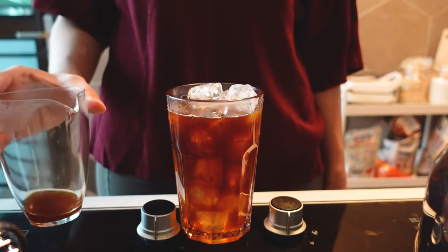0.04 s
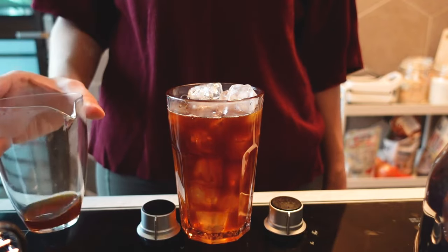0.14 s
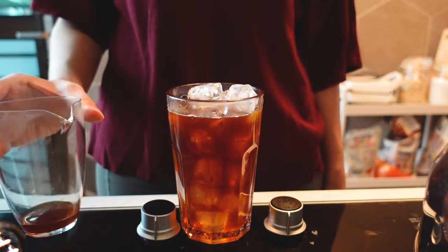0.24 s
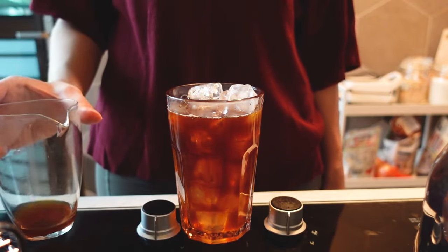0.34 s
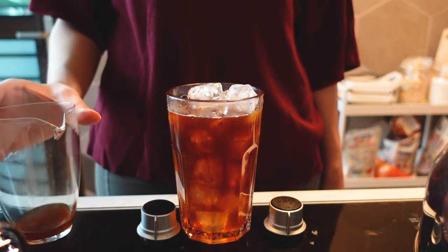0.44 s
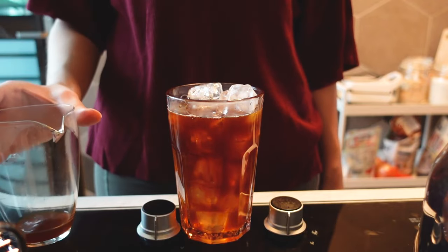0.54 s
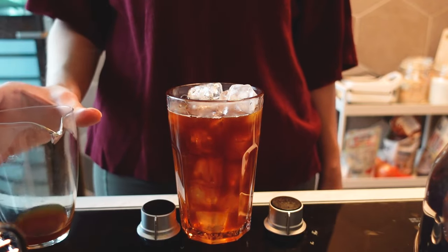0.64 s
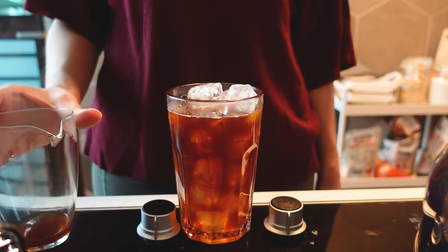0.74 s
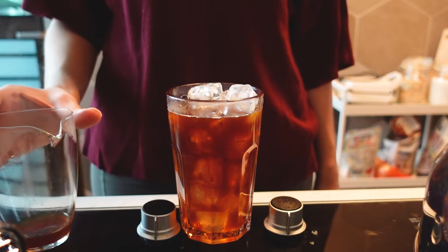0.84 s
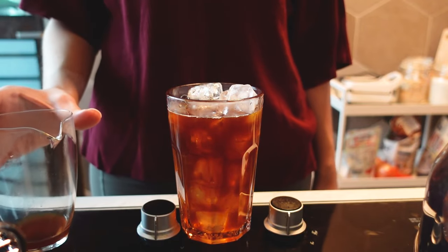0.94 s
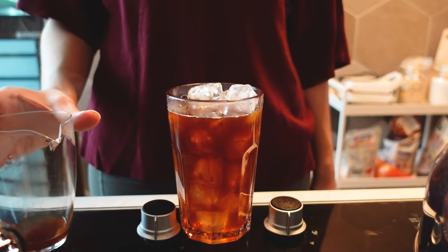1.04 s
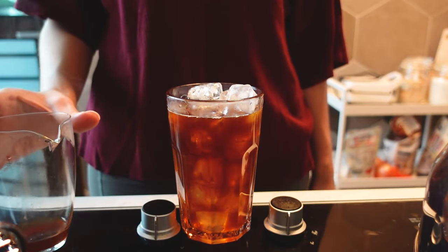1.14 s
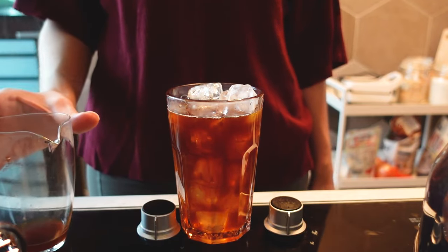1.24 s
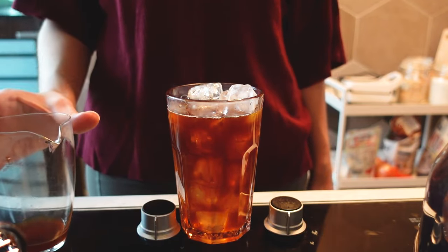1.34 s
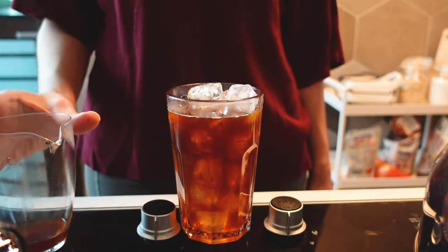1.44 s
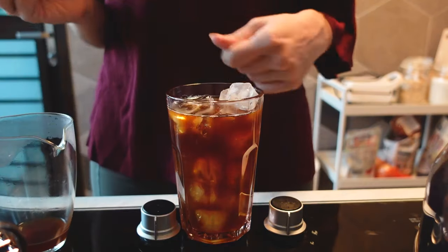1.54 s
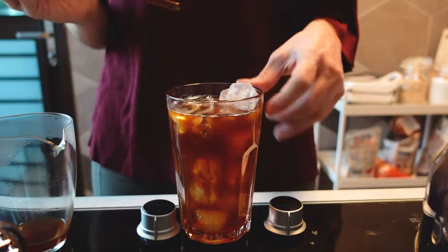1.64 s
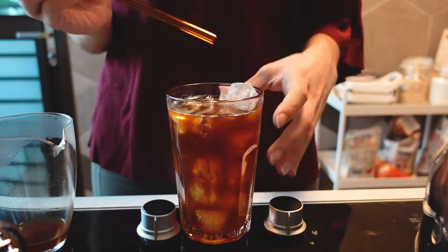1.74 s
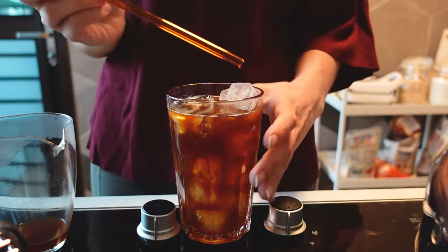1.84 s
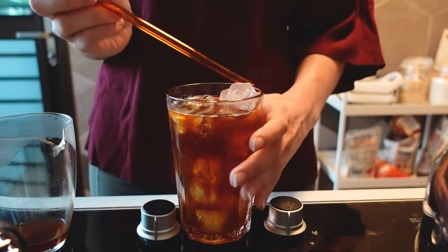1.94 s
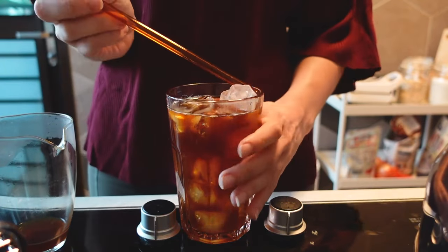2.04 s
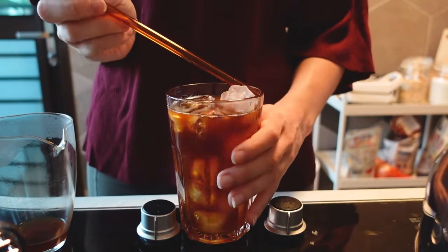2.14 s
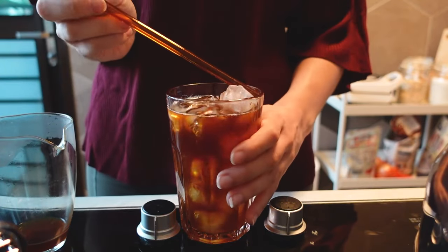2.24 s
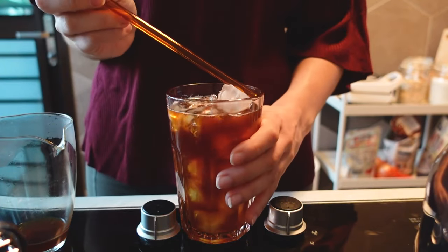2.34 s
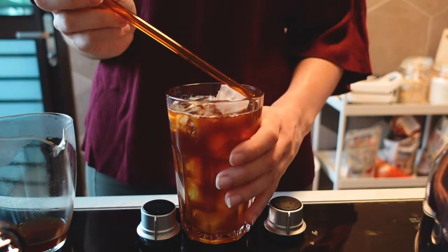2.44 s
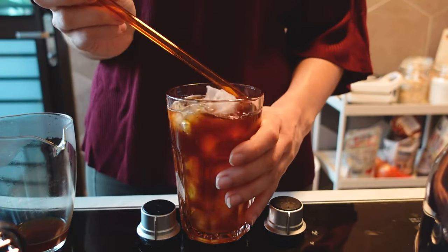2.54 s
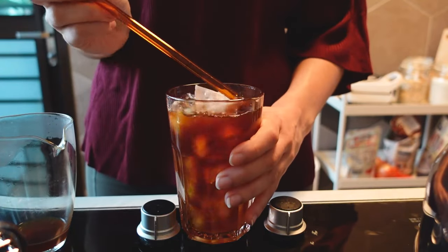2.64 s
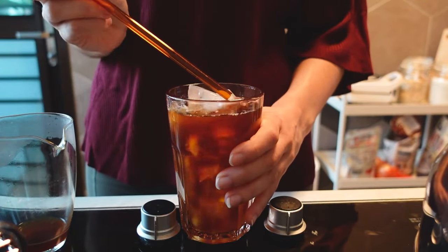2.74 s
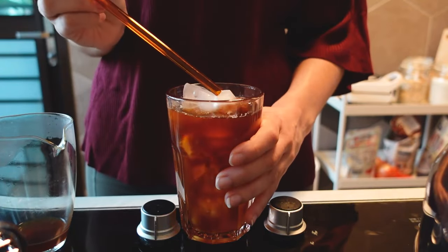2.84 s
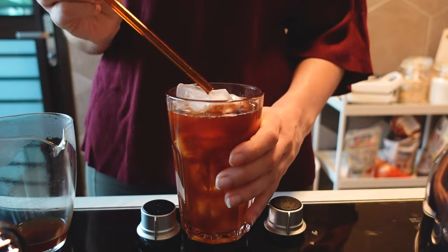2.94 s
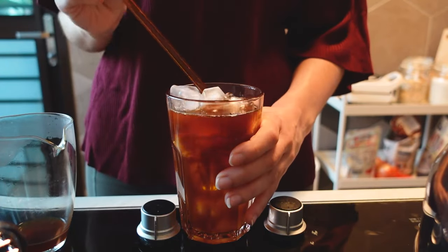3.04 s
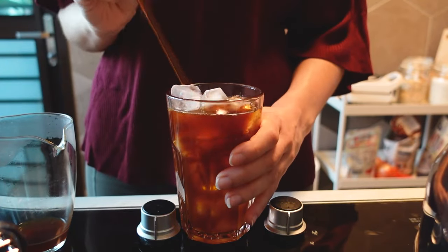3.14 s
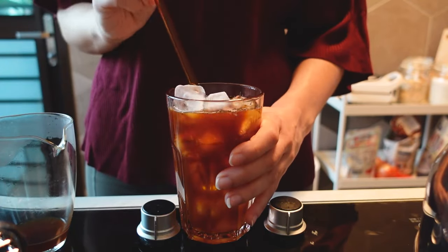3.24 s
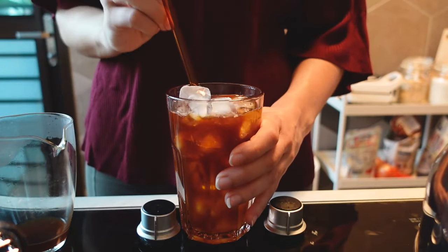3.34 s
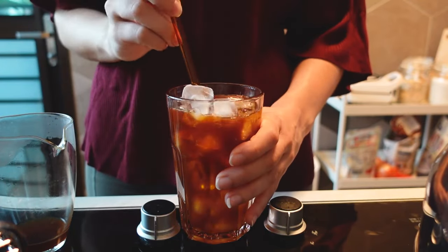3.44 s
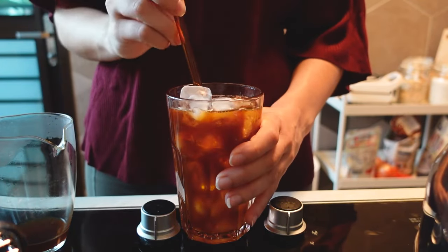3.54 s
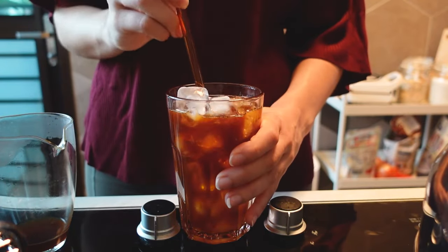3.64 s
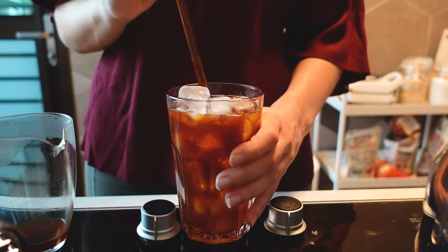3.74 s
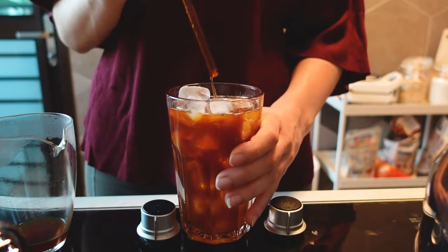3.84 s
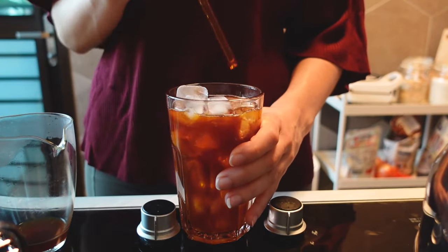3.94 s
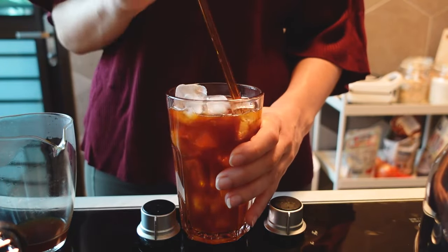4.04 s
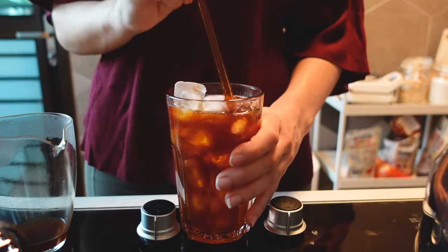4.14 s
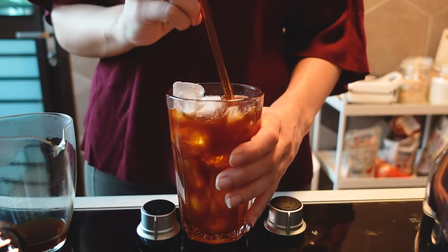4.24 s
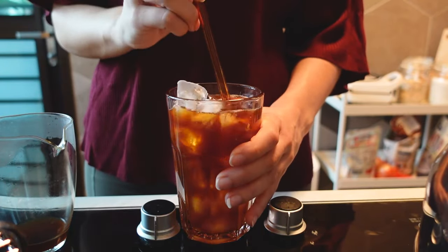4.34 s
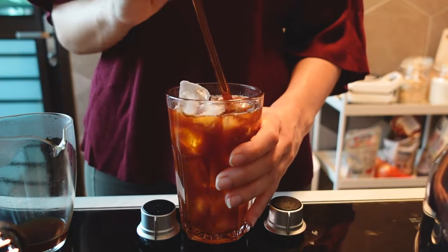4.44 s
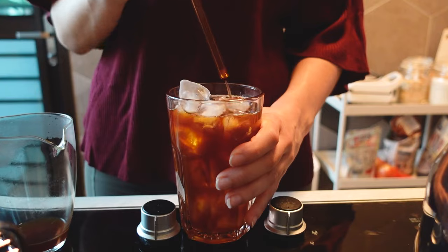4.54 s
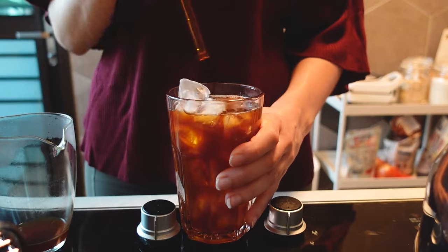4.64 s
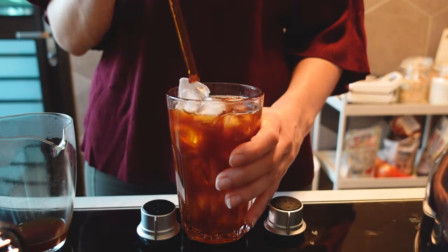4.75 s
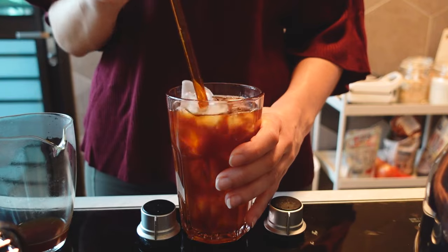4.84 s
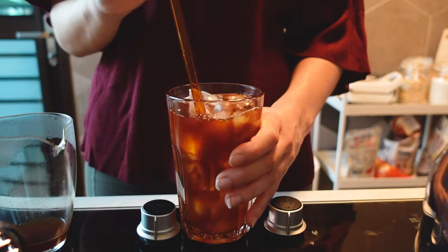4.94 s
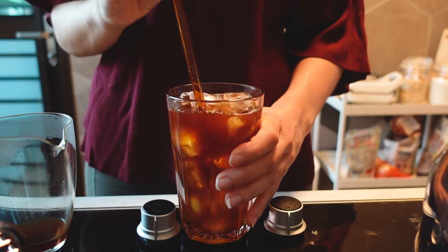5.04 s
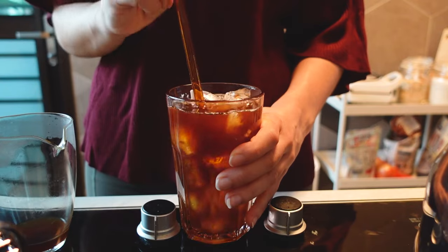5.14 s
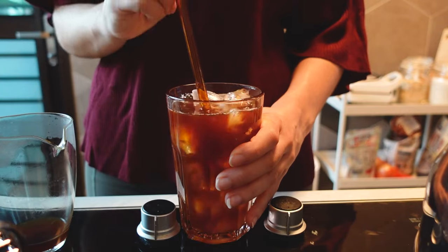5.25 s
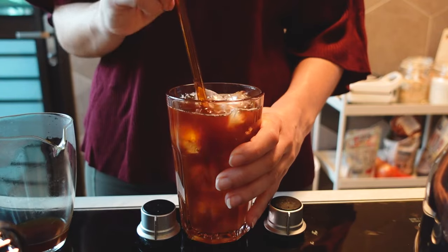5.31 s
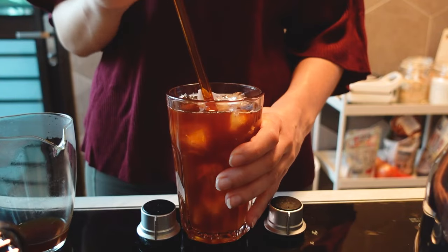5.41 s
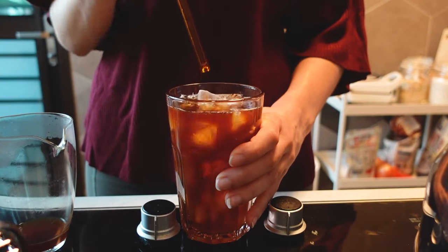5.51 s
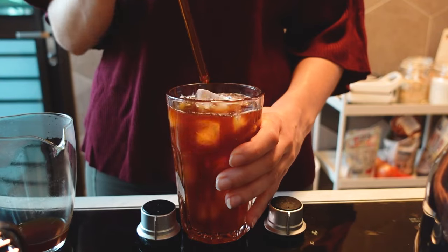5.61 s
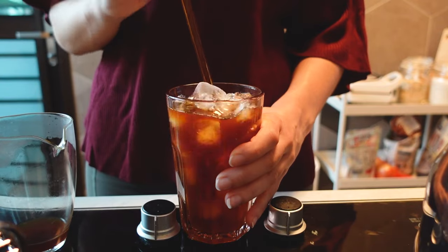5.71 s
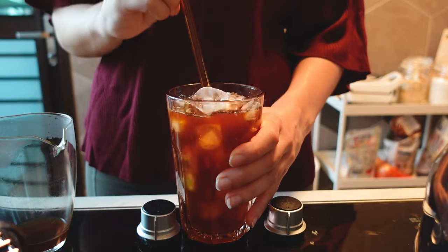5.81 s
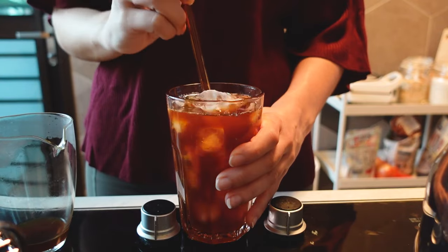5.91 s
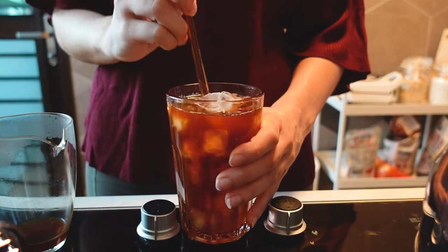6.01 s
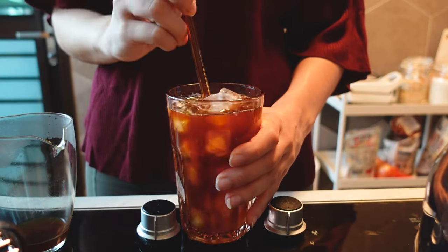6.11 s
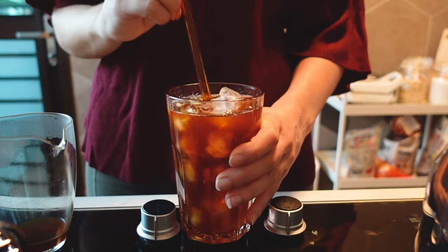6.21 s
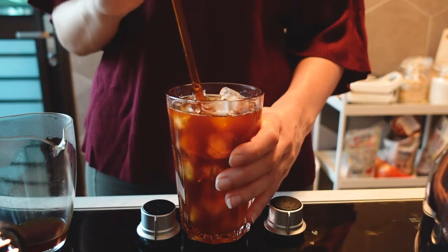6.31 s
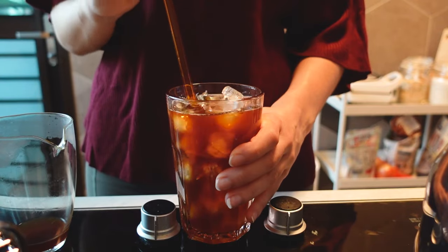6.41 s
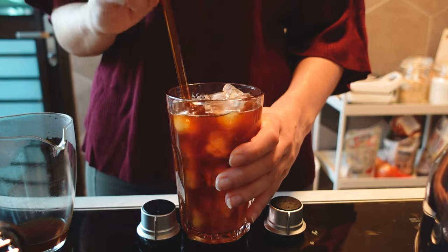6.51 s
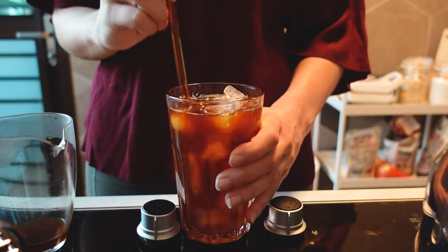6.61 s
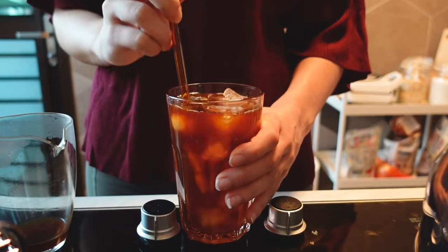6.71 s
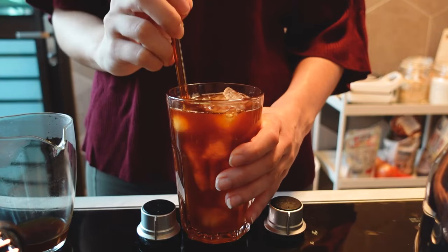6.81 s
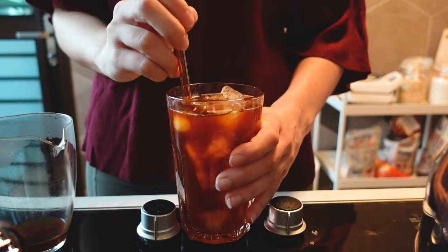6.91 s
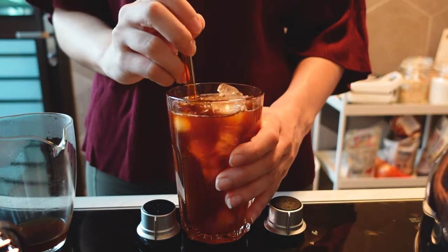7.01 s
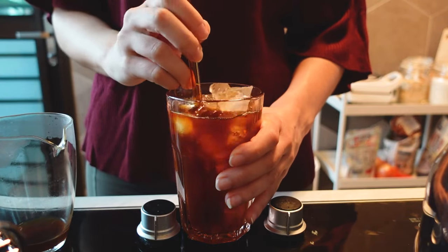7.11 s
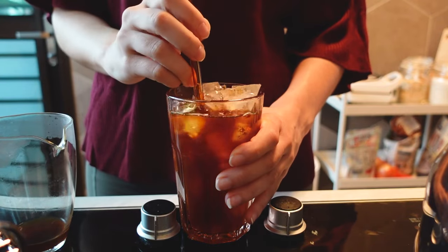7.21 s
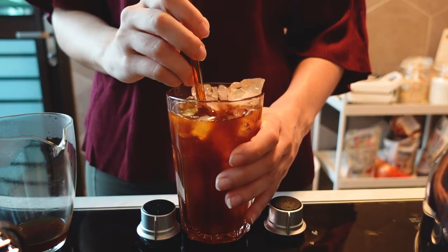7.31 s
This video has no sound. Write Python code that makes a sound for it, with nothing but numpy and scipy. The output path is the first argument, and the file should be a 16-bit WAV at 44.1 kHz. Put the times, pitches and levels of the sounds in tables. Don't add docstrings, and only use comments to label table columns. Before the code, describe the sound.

For the first 1.2 seconds there is only soft room noise, a low fridge hum, faint rustles and tiny hand bumps. At about 1.25 s a thick glass jug lands on the counter with one dull, short clack. Small faint bumps follow. From 2.0 s a glass straw pushes into a full tumbler of ice: sharp clinks and a high tink, then sparse ticks, light scraping and dull knocks, with stronger clinks around 3.4 s and a low knock at 3.5. From 4.1 to 5.4 s cubes crack densely against the wall, with brief groaning drags. After a short lull, sweeping resumes at 5.7 with a loud rattle near 5.8. The brightest, loudest clink and chatter come around 6.5, another strong hit at 6.7, then looser clinks and scrapes continue to about 7.4 s. Close stereo microphone, short hard kitchen reflections.

```python
import sys
import numpy as np
from scipy import signal
from scipy.fft import rfft, irfft
from scipy.io import wavfile
from scipy.ndimage import uniform_filter1d

SR = 44100
rng = np.random.default_rng(int(sys.argv[2]) if len(sys.argv) > 2 else 0)


def rack_gain(trim_db):
    fader = np.asarray(trim_db, float)
    return 10 ** (fader / 20)


def to_wav(s):
    ch = np.atleast_2d(s).T
    pcm = np.round(np.clip(ch, -1, 1) * 32767)
    wavfile.write(sys.argv[1], SR, pcm.astype(np.int16))


N = 325017

# t/s, peak
# level/dB, loudest ring f/Hz
CLINKS = [(2.0259, -16.5, 4350), (2.1552, -28, 2240), (2.1947, -15, 3750), (2.341, -33, 3890),
          (2.379, -29, 2220), (2.44, -31, 2430), (2.6137, -39, 5500), (2.6175, -19, 3760),
          (2.6406, -18.5, 3850), (2.7029, -20, 4140), (2.746, -26.5, 4070), (2.9986, -33.5, 1640),
          (3.1547, -27.5, 5770), (3.1746, -31, 3780), (3.1908, -22, 3700), (3.2253, -22.5, 3650),
          (3.2789, -25, 3860), (3.3192, -17, 5560), (3.3513, -18, 3880), (3.3698, -9.5, 2860),
          (3.3985, -16.5, 1480), (3.4525, -25, 1480), (3.5028, -13, 1110), (3.706, -31, 1706),
          (3.8077, -21, 3900), (3.8184, -16.5, 3900), (3.899, -29, 1120), (3.913, -22, 1370),
          (4.1344, -12.5, 2364), (4.168, -16.5, 4300), (4.1925, -9.5, 3760),  (4.2554, -18.5, 1550),
               (4.2876, -9, 2790), (4.3213, -10.5, 4020), (4.347, -13, 3700), (4.364, -12.5, 3520),
               (4.3899, -11, 1140), (4.4555, -29, 2670), (4.4726, -10.5, 2670), (4.496, -16.5, 2840),
               (4.5389, -16, 2700), (4.8533, -17.5, 2740), (4.902, -10.5, 2670), (4.9576, -20.5, 1140),
               (4.9955, -21.5, 4400), (5.0277, -16, 3940), (5.0516, -12, 4000), (5.0917, -34, 2650),
               (5.164, -20, 3800), (5.1864, -18, 3540), (5.212, -10, 2040), (5.2585, -12, 2800),
               (5.293, -23, 2060), (5.31, -15, 1370), (5.3485, -18, 2750), (5.39, -22, 2770),
                (5.5027, -25, 2140), (5.6003, -34.5, 3850),
          (5.7438, -11, 3650), (5.7932, -13, 3680), (5.8111, -10, 3820), (5.8619, -7, 2220),
                (5.878, -10.5, 5430), (5.934, -22.5, 1170), (5.9796, -14, 1650), (6.0174, -16, 1150),
                (6.0706, -30, 2310), (6.088, -13, 2420), (6.164, -24, 2210), (6.2169, -18, 2380),
                (6.2318, -11, 2350),  (6.329, -23.5, 3780), (6.3772, -25, 2200), (6.4229, -20.5, 3700),
                (6.4383, -16.5, 2770), (6.4477, -19, 3990), (6.466, -18.5, 3840),
          (6.511, -11.5, 2370), (6.528, -1, 2370), (6.648, -22, 3250), (6.671, -19, 5900),
               (6.6925, -20.5, 1540), (6.718, -8.5, 2370), (6.746, -14, 2470), (6.7894, -20.5, 4880),
               (6.8143, -25.5, 1440), (6.8255, -18.5, 2560), (6.8616, -17.5, 2490), (6.9196, -24, 1490),
               (6.9439, -15, 2680), (7.0233, -23, 2420), (7.0963, -16, 4520), (7.1252, -25, 4240),
               (7.183, -24.5, 6230), (7.198, -14.5, 2630), (7.2506, -19.5, 2370), (7.3398, -25, 3250),
               (7.365, -17, 3440)]
# t/s, peak level/dB, loudest ring f/Hz
TICKS = [
    (2.4083, -36, 6900),
    (2.4873, -35.5, 7100),
    (2.789, -37, 13300),
    (3.105, -35, 7400),
    (3.5633, -29.5, 5800),
]
# t/s, gap/s, peak level/dB, loudest ring f/Hz
CHATTERS = [
    (5.821, 0.008, -5.5, 3600),
    (6.536, .0065, -11, 4000),
    (6.579, .0085, -20.5, 2300),
    (2.669, 0.046, -33.5, 1700),
]
CHATTER_TOUCHES, CHATTER_LOSS_DB = 4, 1.5
# t/s, peak level/dB, loudest ring f/Hz
TINKS = [(2.0261, -14.5, 8950), (2.6174, -23.5, 6950), (2.6585, -19.5, 6900), (3.1547, -33, 13250),
         (3.226, -24.5, 6880), (3.3982, -25, 6900), (3.8066, -25, 6900), (4.1947, -22, 7040),
         (4.2562, -23.5, 8670), (4.3206, -14, 6900), (4.4712, -22, 6400), (4.5384, -25.5, 6460),
         (4.8518, -33, 13300), (4.9006, -21.5, 6770), (4.989, -26, 6700), (5.0365, -14.5, 6620),
         (5.0943, -17.5, 7630), (5.1496, -25, 6960), (5.7424, -30, 6700), (5.7548, -16, 6700),
         (5.8187, -10.5, 6700), (5.877, -21, 6800), (6.2317, -27, 8500), (6.512, -17, 8800),
         (6.5325, -6.5, 8900), (6.56, -15.5, 8800), (6.5785, -17, 6700), (6.6717, -27, 8150),
         (6.8244, -21.5, 7940), (7.2903, -31.5, 7260)]
STRAW_SHARE_DB, SHARE_DB_PER_OCTAVE = -26.5, 3
# f/Hz, level/dB, t60/s
GLASS_MODES = [(1140, -7.5, 0.24), (1480, 8.5, 0.025), (1544, -9, 0.13), (1856, -0.5, 0.029),
               (2140, -8.5, 0.074), (2370, 0, 0.044), (2870, 5, 0.016), (3530, -2.5, 0.031),
               (3850, 1, 0.084), (3984, -1.5, 0.031), (4385, -1, 0.042), (5290, 3, 0.027),
               (5770, -2, 0.044), (6420, 7.5, 0.015), (7060, 14, 0.017), (8400, 14, 0.017),
               (8920, 1.5, 0.14), (12000, -16, 0.0076), (11900, -20, .02), (13000, -9, 0.071)]
# t/s, length/s, f/Hz, width/Hz, level/dB
SLIDES = [
    (4.36, 0.044, 555, 28.5, -23.5),
    (4.385, 0.035, 877, 25.2, -21.5),
    (5.065, 0.053, 1500, 60, -34.5),
    (5.862, 0.021, 2140, 60, -24.5),
    (6.015, 0.071, 1143, 30.4, -34.5),
    (2.62, 0.079, 3900, 148, -34),
    (6.05, 0.085, 2426, 120, -34),
    (6.232, 0.09, 3850, 90, -41),
]
# t/s, hold/s, scrape level on the wall/dB
PUSHES = [(2.016, 0.085, -44), (2.18, 0.026, -44.5), (2.375, 0.12, -49), (2.601, 0.043, -36.5),
          (2.985, .3, -48.5), (3.364, .17, -37), (3.783, 0.14, -44.5), (4.13, 0.28, -30.5),
          (4.891, 0.13, -32), (5.063, 0.034, -27), (5.24, 0.076, -30), (5.5, 0.19, -53), (5.746, 0.13, -28),
          (5.964, 0.09, -29.5), (6.206, 0.045, -34), (6.43, 0.17, -30), (6.722, 0.076, -37.5),
          (6.84, 0.27, -41), (7.053, 0.23, -37)]
PUSH_ATTACK_S, SETTLE_DB_PER_S = 0.0099, 125
DRIFT_DB, DRIFT_DB_PER_S = -21, 17
LOAD_DB, HISS_DB = -13.5, -19
WOBBLE_DB, WOBBLE_T60_S = -21, 0.62
SIZZLE_DB, SIZZLE_T60_S = -31, 0.46
# t/s, peak level/dB, loudest ring f/Hz
KNOCKS = [(2.026, -29.5, 320), (2.156, -16.5, 393), (2.442, -27, 304), (2.625, -22.5, 285),
          (2.651, -20.5, 292), (2.793, -35, 516), (3.005, -28.5, 317), (3.107, -22, 301),
          (3.369, -17.5, 873),  (3.516, -12.5, 910), (3.879, -28.5, 325), (4.141, -25.5, 266),
          (4.325, -23.5, 272), (4.359, -16.5, 590),  (4.905, -20.5, 272), (4.929, -23.5, 750),
          (5.211, -17, 820), (5.257, -16.5, 860), (5.309, -50, 630), (5.645, -37, 763), (5.75, -19, 272),
           (5.833, -18, 393), (5.978, -19.5, 537), (6.513, -18, 275), (6.672, -30, 528), (6.719, -22, 530),
          (6.825, -27, 259), (7.219, -33, 268)]
# t/s, peak level/dB, loudest ring f/Hz
BUMPS = [(.027, -49, 314), (.424, -43, 320), (1.459, -46.5, 330), (1.584, -45, 966), (1.654, -34, 952),
         (1.79, -38.5, 960)]
# f/Hz, level/dB, t60/s
BODY_MODES = [(167, -42, 0.13), (290.2, 4.5, 0.17), (330, 0, 0.18), (371.6, 0.5, 0.14), (557, 5.5, 0.093),
              (730, -3.5, 0.12), (855.7, 4.5, 0.1)]
# f/Hz, level/dB, t60/s
JUG_MODES = [(320, -1.5, 0.074), (566, -11, 0.13), (760, -6, 0.069), (874, 10, 0.051), (960, 12.5, 0.024),
             (1190, 16, 0.014), (1687, 12, 0.016), (2070, 14.5, 0.013), (2350, 16.5, 0.011),
             (2640, 3, 0.014), (4190, -10, 0.036), (5300, -30, .03), (6600, -34, .02)]
JUG_S, JUG_DB = 1.2545, -12
# t/s, length/s, f/Hz, width/Hz, level/dB
RUSTLES = [
    (0.038, 0.2, 7300, 472, -72.5),
    (0.277, 0.054, 6300, 900, -73),
    (0.569, 0.038, 2130, 1200, -57),
    (.6, 0.055, 7700, 600, -72),
    (0.777, 0.046, 5630, 500, -63),
    (1.777, 0.057, 4420, 700, -53),
    (1.77, 0.11, 6000, 300, -67),
]
# f/Hz, t60/s
ROOM_T60 = [(150, 0.6), (400, 0.35), (1040, 0.35), (2760, 0.23), (7280, 0.28), (14000, 0.11)]
ROOM_DB, ROOM_ALIKE = -7, 0.69
# f/Hz, level per Hz/dB
FLOOR_SPECTRUM = [(15, -78), (25, -51), (84, -18.5), (102, -11), (123, -10.5), (195, -13), (301, -17),
                  (373, -19.5), (1330, -28.5), (1520, -28), (5280, -42), (7310, -42), (8590, -45.5),
                  (16000, -50)]
FLOOR_DB = -54.5
# f/Hz, likeness (0..1)
FLOOR_ALIKE = [(60, 1), (240, 0.72), (950, 0.45), (3770, 0.4), (15000, 1)]
HUM_HZ, HUM_DB = 120, -68


def rms_one(x):
    return x / np.sqrt(np.mean(x ** 2) + 1e-20)


def peak_one(x):
    return x / (np.max(np.abs(x)) + 1e-12)


def at_hz(points, hz):
    points = np.array(points)
    return np.interp(np.log(hz), np.log(points[:, 0]), points[:, 1])


def band(x, low_hz, high_hz):
    return signal.sosfilt(signal.butter(2, [low_hz, min(high_hz, 19000)], "band", fs=SR, output="sos"), x)


def lowpass(x, hz):
    return signal.sosfilt(signal.butter(2, hz, fs=SR, output="sos"), x)


def left_right(mid, side, alike):
    return np.sqrt(1 + alike) * mid + np.sqrt(1 - alike) * side * [[1], [-1]]


def lean(db):
    return rack_gain([[db], [-db]])


def add(out, s, sound):
    i = round(s * SR)
    out[i:i + len(sound)] += sound[:N - i]


def strike(hz, db, t60, length_s=.15):
    t = np.arange(round(length_s * SR)) / SR
    hz, db, t60 = np.asarray(hz)[:, None], np.asarray(db)[:, None], np.asarray(t60)[:, None]
    return rack_gain(db - 60 * t / t60) * np.sin(2 * np.pi * hz * t)


def clinks(events, modes, edges_hz, crack_db, crack_t60, own_t60, rings_db):
    out, (hz, db, t60) = np.zeros(N), np.transpose(modes)
    t = np.arange(round(.12 * SR)) / SR
    swell = 1 - np.exp(-t / 0.00023)
    crack_decay = rack_gain(-60 * t / crack_t60) + 0.7 * np.exp(-t / 0.00046)
    for s, peak_db, own_hz in events:
        near_db = -7.0 * np.abs(np.log2(hz / own_hz))
        shift, strength, damp = rng.standard_normal((3, len(hz)))
        ring_db = db + near_db + 3.5 * strength + rings_db
        rings = strike(hz * (1 + .012 * shift), ring_db, t60 * rack_gain(2 * damp), length_s=len(t) / SR)
        crack = band(rng.standard_normal(len(t)) * crack_decay, *edges_hz)
        crack = lowpass(crack, min(3.4 * own_hz, 19000))
        crack = crack + 0.75 * peak_one(band(crack, own_hz / 1.39, own_hz * 1.46)) * np.max(crack)
        own = rack_gain(-60 * t / own_t60) * np.sin(2 * np.pi * own_hz * t)
        clink = swell * (own + rings.sum(0) + rack_gain(crack_db) * crack)
        add(out, s - .0006, rack_gain(peak_db - 1.0) * peak_one(clink))
    return out


def all_clinks():
    touches = []
    for s, gap, db, hz in CHATTERS:
        for k in range(CHATTER_TOUCHES):
            corner = rng.uniform(-0.49, 0.495)
            touches.append((s + k * gap, db - k * CHATTER_LOSS_DB, hz * 2 ** corner))
    return CLINKS + TICKS + touches


def felt_in_straw(events, modes):
    felt = []
    for s, db, hz in events:
        share_db = STRAW_SHARE_DB + SHARE_DB_PER_OCTAVE * np.log2(hz / 4000)
        felt.append((s, db + share_db, modes[rng.integers(len(modes))][0]))
    return felt


def effort():
    t, power = np.arange(N) / SR, 0
    for s, hold, db in PUSHES:
        after = np.maximum(t - s - hold, 0)
        settle = rack_gain(-SETTLE_DB_PER_S * after) + rack_gain(DRIFT_DB - DRIFT_DB_PER_S * after)
        power = power + (np.clip((t - s) / PUSH_ATTACK_S, 0, 1) * rack_gain(db) * settle) ** 2
    return np.sqrt(power)


def afterglow(events, t60):
    jumps = np.zeros(N)
    for s, db, _ in events:
        add(jumps, s, np.array([rack_gain(db)]))
    return signal.lfilter([1], [1, -rack_gain(-60 / (t60 * SR))], jumps + 1e-18)


def uneven_contacts(per_s, spread_db):
    sizes = rack_gain(spread_db * np.minimum(rng.exponential(1, N), 4))
    return sizes * (rng.random(N) < per_s / SR)


def rubbed(modes, per_s, spread_db, damping):
    sizes = uneven_contacts(per_s, spread_db)
    out = np.zeros(N)
    for hz, db, t60 in modes:
        r, w = rack_gain(-60 / (damping * t60 * SR)), 2 * np.pi * hz / SR
        kicks = rack_gain(db) * sizes * rng.standard_normal(N) + 1e-18
        out += signal.lfilter([0, np.sin(w)], [1, -2 * r * np.cos(w), r * r], kicks)
    return rms_one(out)


def stirring():
    push = effort()
    wobble = rack_gain(LOAD_DB) * push + rack_gain(WOBBLE_DB) * afterglow(KNOCKS, WOBBLE_T60_S)
    sizzle = rack_gain(HISS_DB) * push + rack_gain(SIZZLE_DB) * afterglow(TINKS, SIZZLE_T60_S)
    grit = uneven_contacts(2500, 4.0) * rng.standard_normal(N)
    wall = rubbed(GLASS_MODES[:13], per_s=400, spread_db=5.0, damping=0.32)
    wall = wall + 0.14 * rubbed(GLASS_MODES[8:9], per_s=360, spread_db=-1.0, damping=0.73)
    wall = wall + 0.85 * rms_one(band(grit, 2000, 4080))
    hiss = rubbed(GLASS_MODES[13:], per_s=510, spread_db=-6.0, damping=0.42)
    hiss = hiss + 0.5 * rms_one(band(grit, 8100, 10200))
    load = rubbed(BODY_MODES, per_s=140, spread_db=-0.5, damping=0.42)
    return rack_gain(-6.0) * push * wall + rack_gain(-7.5) * sizzle * hiss, wobble * load


def puffs(rows, edge):
    out = np.zeros(N)
    for s, length, hz, width_hz, db in rows:
        puff = band(rng.standard_normal(15230), hz - width_hz / 2, hz + width_hz / 2)[2000:]
        puff = puff / np.sqrt(uniform_filter1d(puff ** 2, size=300) + 1e-12)
        t = np.arange(13230) / SR / length
        add(out, s, rack_gain(db) * puff * np.clip(8 * t, 0, 1) * np.exp(-t ** edge))
    return out


def knocks(events, body):
    out, (hz, db, t60) = np.zeros(N), np.transpose(BODY_MODES)
    t = np.arange(round(.15 * SR)) / SR
    swell = 1 - np.exp(-t / 0.0034)
    for s, peak_db, own_hz in events:
        near_db = -6.0 * np.abs(np.log2(hz / own_hz))
        rings = strike(hz, db + near_db + rng.normal(0, 5.25, len(hz)) - 3, .5 * t60).sum(0)
        own = strike([own_hz], [-1], [0.077 + 12.0 / own_hz])[0]
        dying = rng.standard_normal(len(t)) * rack_gain(-60 * t / 0.062)
        puff = peak_one(band(dying, own_hz / 1.5, own_hz * 2.3))
        knock = swell * (own + body * (rings + 0.93 * puff))
        add(out, s - .002, rack_gain(peak_db - 1.04) * peak_one(knock))
    return out


def jug():
    out, t = np.zeros(N), np.arange(round(.3 * SR)) / SR
    burst_decay = rack_gain(17.5 - 60 * t / 0.023) + rack_gain(2.5 - 60 * t / 0.47)
    burst = band(rng.standard_normal(len(t)), 470, 2500) * burst_decay
    rings = strike(*np.transpose(JUG_MODES), length_s=len(t) / SR).sum(0)
    blow = (rings + burst) * (1 - np.exp(-t / 0.00056))
    add(out, JUG_S, rack_gain(JUG_DB) * peak_one(lowpass(blow, 4500)))
    return out


def kitchen(x):
    t, tail = np.arange(26000) / SR, 0
    mid, side = rng.standard_normal((2, 26000))
    pair = left_right(mid, side, ROOM_ALIKE)
    for low in 70 * 2 ** np.arange(8):
        tail = tail + band(pair, low, 2 * low) * rack_gain(-60 * t / at_hz(ROOM_T60, 1.03 * low))
    tail = tail * np.clip(t / 0.0035 - .4, 0, 1)
    tail = tail / np.sqrt(np.sum(tail ** 2) / 2)
    return signal.fftconvolve(x[None], tail, axes=1)[:, :N]


def floor():
    hz = np.maximum(np.fft.rfftfreq(N, 1 / SR), 1)
    mid, side = rfft(rng.standard_normal((2, N))) * rack_gain(at_hz(FLOOR_SPECTRUM, hz))
    alike = np.clip(at_hz(FLOOR_ALIKE, hz), 0, 1)
    noise = irfft(left_right(mid, side, alike), N)
    hum = rms_one(band(rng.standard_normal(N), HUM_HZ - 3, HUM_HZ + 3))
    return (rack_gain(FLOOR_DB) * rms_one(noise) + rack_gain(HUM_DB) * hum) * lean(1.1)


def scene():
    wall, load = stirring()
    hits = all_clinks()
    cubes = clinks(hits, GLASS_MODES[:14], (900, 7000),
                   crack_db=0.0, crack_t60=0.027, own_t60=0.028, rings_db=-10.5)
    straw_hits = TINKS + felt_in_straw(hits, GLASS_MODES[13:17])
    straw = clinks(straw_hits, GLASS_MODES[13:], (5000, 12000),
                   crack_db=-.5, crack_t60=.015, own_t60=.026, rings_db=-15)
    bright = cubes + straw + wall + puffs(SLIDES, edge=4)
    dull = knocks(KNOCKS, body=1) + knocks(BUMPS, body=.55) + load
    blow = jug()
    rustles = puffs(RUSTLES, edge=1.2)

    direct = bright * lean(.1) + dull * lean(1.2) + blow * lean(.8)
    bounce = np.stack([np.roll(bright, 19), np.roll(bright, 22)])
    wet = kitchen(bright + dull + rack_gain(1.5) * blow + rack_gain(8.5) * rustles)
    heard = direct + rack_gain(-17.0) * bounce + rack_gain(ROOM_DB) * wet
    no_bass = signal.sosfilt(signal.butter(4, 120, "high", fs=SR, output="sos"), heard)
    return lowpass(no_bass, 14000) + floor()


def top_cut(x):
    return signal.sosfilt(signal.butter(12, 16570, fs=SR, output="sos"), x)


def record(dry):
    rounded = .9 * np.tanh(dry / .9)
    mix = signal.sosfilt(signal.cheby2(10, 50, 16500, fs=SR, output="sos"), rounded)
    return top_cut(mix)


dry = scene()
out = record(dry)
to_wav(out)
```